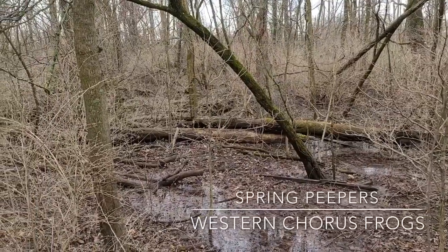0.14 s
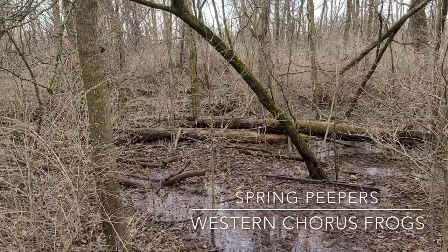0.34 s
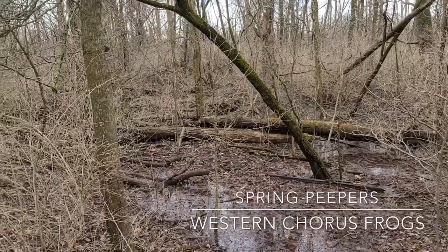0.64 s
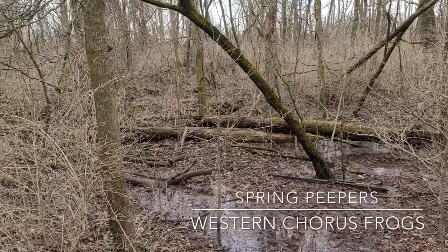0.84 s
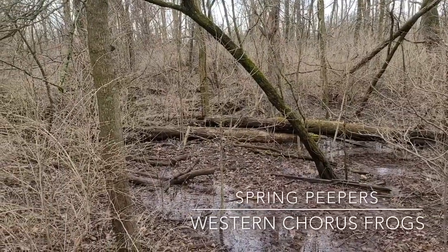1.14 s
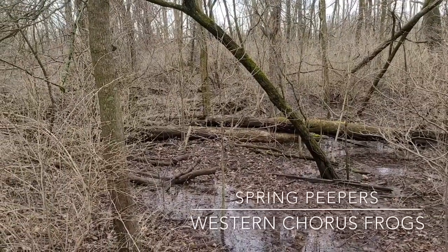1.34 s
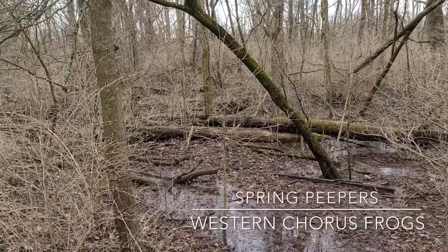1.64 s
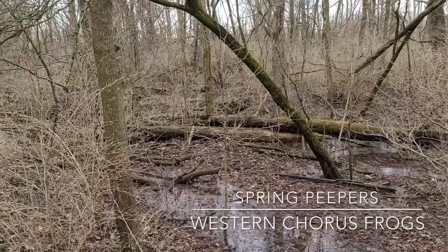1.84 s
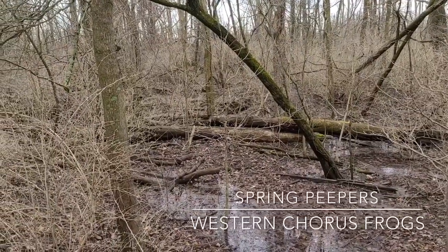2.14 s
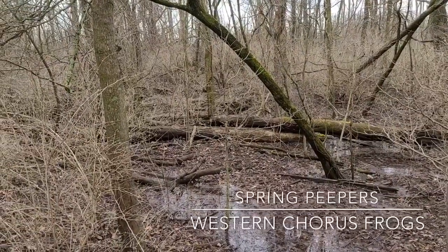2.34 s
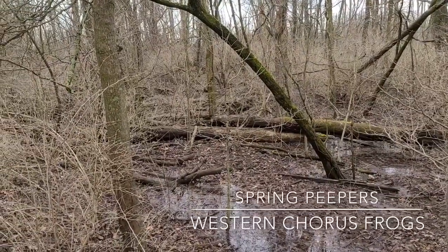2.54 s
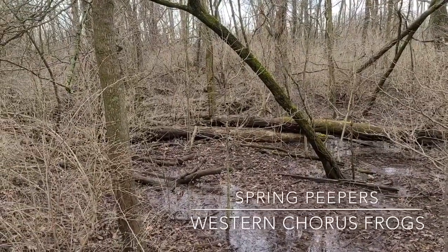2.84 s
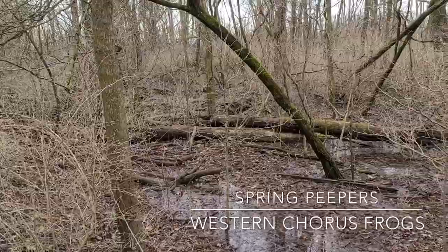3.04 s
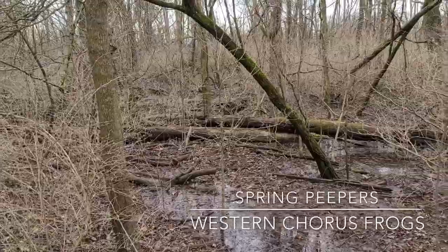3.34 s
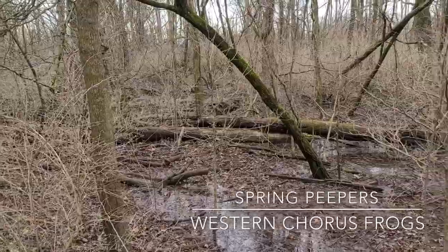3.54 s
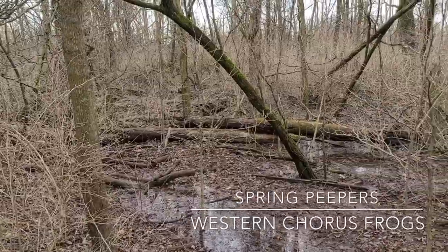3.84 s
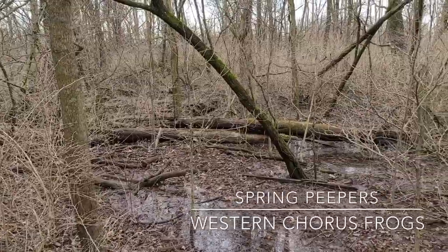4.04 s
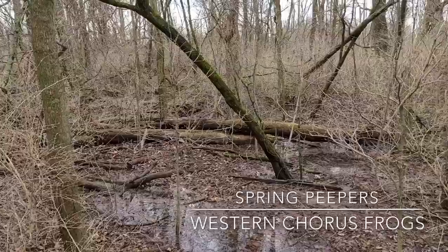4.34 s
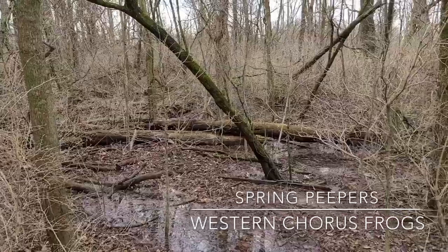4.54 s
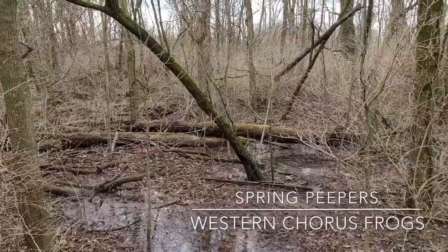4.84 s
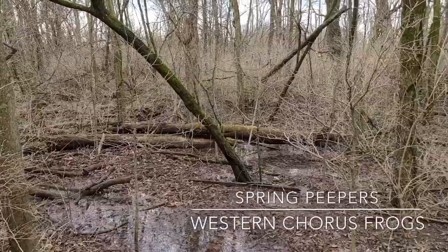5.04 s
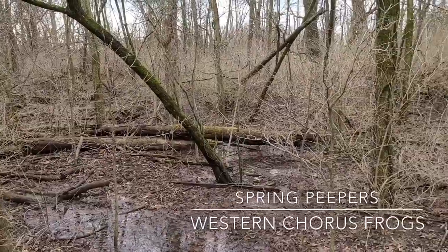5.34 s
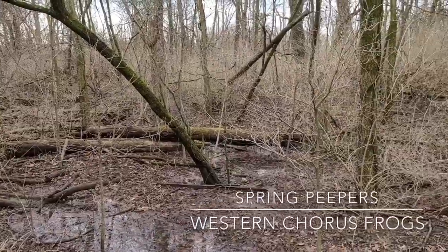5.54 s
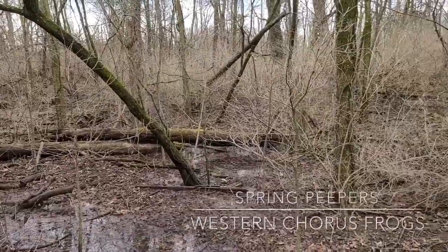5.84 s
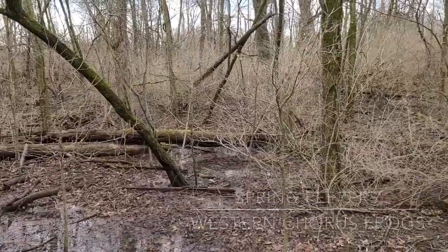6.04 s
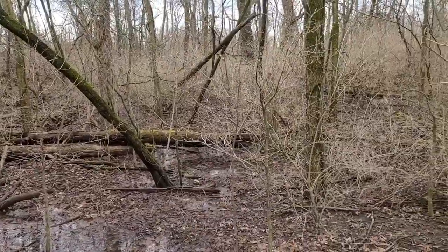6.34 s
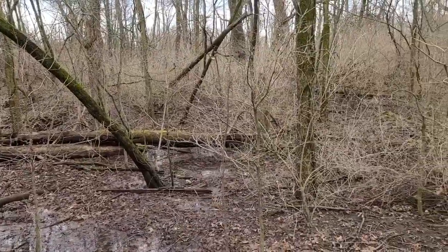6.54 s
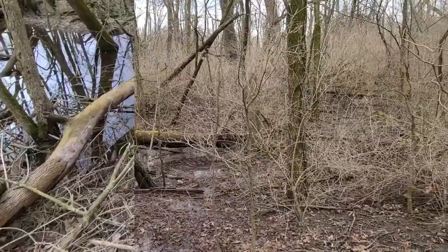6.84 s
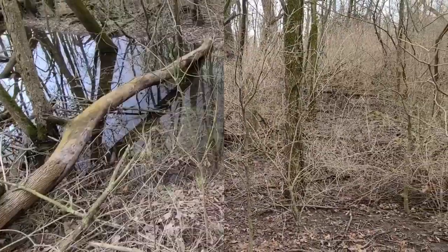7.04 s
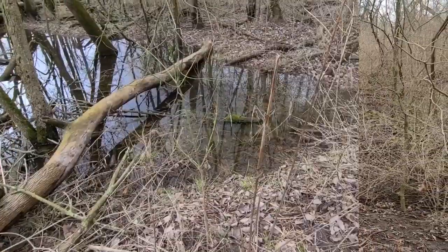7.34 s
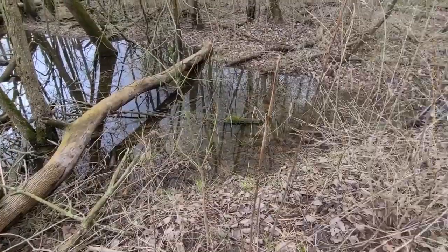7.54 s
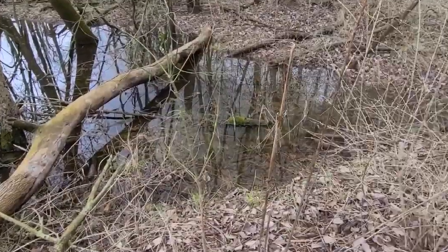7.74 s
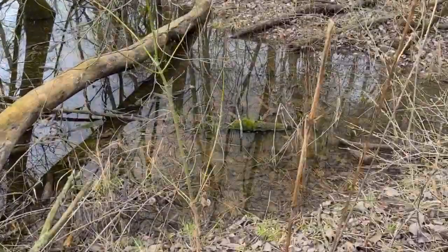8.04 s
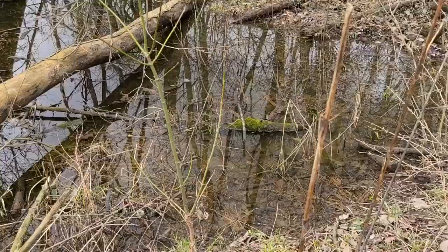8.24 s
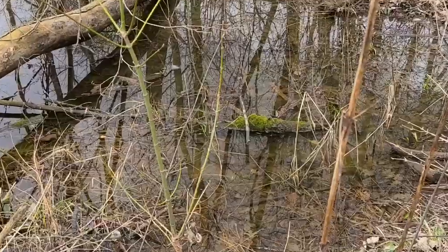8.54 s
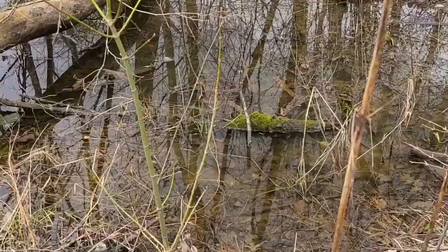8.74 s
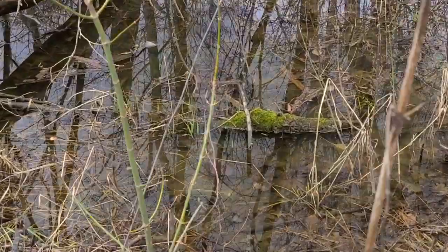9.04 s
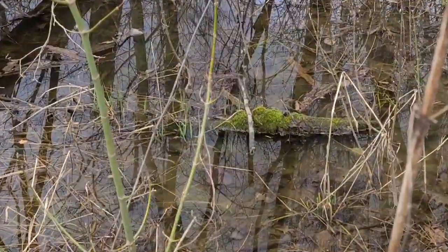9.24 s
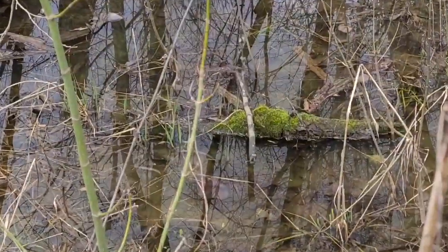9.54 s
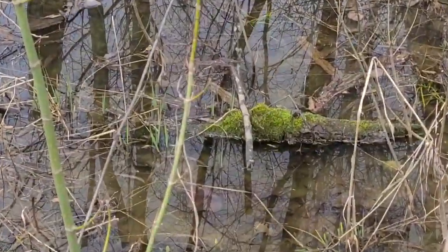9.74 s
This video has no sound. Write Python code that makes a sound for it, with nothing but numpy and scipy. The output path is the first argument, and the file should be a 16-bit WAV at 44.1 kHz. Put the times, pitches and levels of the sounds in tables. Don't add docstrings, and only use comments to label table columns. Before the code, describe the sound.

Outdoors in a wet, leafless wood, overlapping frog trills like a thumbnail along a comb rise in pitch, some nearer, many far and reverberant. Deep road rumble and faint engine drones lie below. Sharp twig cracks and crisp leaf rustles sound close on the left, with tiny bird whistles. After a scene change near seven seconds the frogs drop back, drips click, and close rustling moves right.

```python
import sys
import numpy as np
from scipy import signal
from scipy.io import wavfile
from scipy.ndimage import uniform_filter1d

SR = 44100
rng = np.random.default_rng(int(sys.argv[2]) if len(sys.argv) > 2 else 0)


def field_ratio(decibels):
    return 10 ** (np.asarray(decibels, dtype=float) / 20)


def digitize_waveform(pressure):
    field = np.atleast_2d(pressure).T
    bounded = np.clip(field, -1, 1)
    quanta = np.round(bounded * 32767).astype(np.int16)
    wavfile.write(sys.argv[1], SR, quanta)


N = 436130


def evened(x):
    return x / np.sqrt(np.mean(x ** 2) + 1e-20)


def read(points, hz):
    f, value = np.transpose(points)
    return np.interp(np.log(hz + 1), np.log(f + 1), value)


def sides(pan_db):
    return field_ratio(np.array([pan_db / 2, -pan_db / 2]))


def add(mix, s, sound):
    part = mix[:, round(s * SR):][:, :sound.shape[1]]
    part += sound[:, :part.shape[1]]


def turned(t, pair):
    turn_s, takes_s = 7.0, 0.23
    return np.interp(t, [turn_s - takes_s / 2, turn_s + takes_s / 2], pair)


def spot_level_db(t):
    # t/s, level/dB
    spot = [
        (0, -0.5),
        (6.0, 0.5),
        (6.5, 1.5),
        (7.1, -5),
        (7.45, -8.5),
        (8.1, -7.5),
        (8.5, -5),
        (9.2, -3.5),
        (9.89, -2),
    ]
    s, db = np.transpose(spot)
    return np.interp(t, s, db)


def noise(shape, patchy_db, size=1024):
    # f/Hz, left-right likeness/1
    likeness = [(60, 0.95), (130, 0.97), (290, 0.76), (640, 0.28), (1410, -0.44), (3100, 0.64),
                (6820, -0.13), (15000, 0.0053)]
    frames = 4 * N // size + 5
    hz = np.fft.rfftfreq(size, 1 / SR)
    hz = hz[hz < shape[-1][0]]
    a, b, c, d, patches = rng.standard_normal((frames, len(hz), 5)).T
    patches = uniform_filter1d(patches, size=10, axis=0)
    patches = evened(uniform_filter1d(patches, size=12, axis=1))
    same = np.clip(read(likeness, hz), -1, 1)[:, None]
    left = a + 1j * b
    right = same * left + np.sqrt(1 - same ** 2) * (c + 1j * d)
    z = np.zeros((2, size // 2 + 1, frames), complex)
    z[:, :len(hz)] = [left, right]
    z[:, :len(hz)] *= field_ratio(read(shape, hz)[:, None] + patchy_db * patches)
    return evened(signal.istft(z, nperseg=size, noverlap=3 * size // 4)[1][:, :N])


def trees(x, t60_s, wet_db):
    t = np.arange(SR // 3) / SR
    signs = rng.choice([-1., 1.], (2, len(t)))
    hits = rng.random((2, len(t))) < .05
    taps = signs * hits * field_ratio(-60 * t / t60_s)
    taps *= field_ratio(wet_db) / np.linalg.norm(taps, axis=1, keepdims=True)
    taps[:, 0] = 1
    return signal.fftconvolve(x, taps, axes=1)


def trill(t, hz, count):
    pulses_per_s, ring_s, spread, half_db = 30, .0021, .022, -17
    out = np.zeros((2, len(t)))
    draws = rng.random((count, 4))
    draws[:, 0] -= draws[:, 0].mean() - .5
    for tune, pace, start, lag in draws:
        rate = pulses_per_s * (.7 + .6 * pace)
        pulses = rate * (t - t[0]) + start
        per_pulse = rng.standard_normal((int(pulses[-1]) + 1, 2))
        strength, detune = per_pulse[pulses.astype(int)].T
        beat_s = pulses % 1 / rate
        phase = 2 * np.pi * beat_s * hz * (1 + spread * (2 * tune - 1) + 0.012 * detune)
        burst = field_ratio(2.2 * strength) * beat_s * np.exp(-beat_s / ring_s)
        voice = burst * (np.sin(phase) + field_ratio(half_db) * np.sin(phase / 2))
        out += [voice, np.roll(voice, round(40 * lag - 20))]
    return evened(out)


def near_frogs():
    # t/s, length/s, starting pitch f/Hz, level/dB, left-right/dB
    trills = [(-.06, 0.71, 2670, -50, 3), (.53, 0.67, 2947, -48, 3.5), (1.271, 0.68, 2682, -50, 4),
              (1.919, 0.53, 2910, -52, -1.5), (2.199, 0.56, 2843, -52, 4.5), (2.66, 0.62, 2658, -50, 2),
              (3.349, 0.66, 2952, -52, 2), (3.621, 0.61, 2856, -51.5, 4), (4.132, 0.61, 2625, -49, 3),
              (4.15, 0.41, 2960, -54.5, 2), (4.749, 0.57, 2934, -50.5, 3), (5.179, 0.53, 2880, -53.5, 4.5),
              (5.36, .7, 2645, -54.5, 8), (6.001, 0.31, 2690, -52.5, 4), (6.15, 0.45, 2918, -48.5, 7),
              (6.3, 0.51, 2975, -54.5, 3.5), (6.552, 0.78, 2610, -56.5, 4.5), (6.701, 0.65, 2820, -58, 3.5),
              (7.7, 0.56, 2840, -63.5, 6), (8.1, 0.89, 2873, -58.5, 1.5), (8.881, 0.67, 2900, -59, 3),
              (9.3, 0.59, 2605, -56.5, -3), (9.719, 0.52, 2980, -52.5, -2)]
    climb, climb_bend = .15, .55
    loudest_at, start_db, end_db = .42, -7, -13
    lead_s = 1
    out = np.zeros((2, N + lead_s * SR))
    for s, length, hz, db, pan_db in trills:
        t = np.arange(0, length, 1 / SR)
        u = t / length
        rise_db = start_db * (1 - u / loudest_at) ** 2
        sink_db = end_db * ((u - loudest_at) / (1 - loudest_at)) ** 2
        swell_db = np.where(u < loudest_at, rise_db, sink_db)
        call = trill(t, hz * (1 + climb * u ** climb_bend), count=6)
        call = call * field_ratio(db + swell_db) * signal.windows.tukey(len(t), .12)
        add(out, s + lead_s, trees(call * sides(pan_db)[:, None], t60_s=.24, wet_db=2.2) * field_ratio(-4.3))
    return out[:, lead_s * SR:]


def far_frogs():
    chorus_db, follow = -55.5, 1.23
    lead_s = 1
    out = np.zeros((2, N + lead_s * SR))
    t = np.arange(0, .7, 1 / SR)
    for size, *starts in rng.random((12, 50)):
        hz = (2650 + 380 * size) * (1 + 0.15 * t)
        call = trees(trill(t, hz, count=1) * np.hanning(len(t)), t60_s=0.66, wet_db=21.0)
        for s in starts:
            add(out, s * (N / SR + lead_s), call)
    return evened(out[:, lead_s * SR:]) * field_ratio(chorus_db + follow * spot_level_db(np.arange(N) / SR))


def leaves():
    # t/s, fall/s, level/dB
    stirs = [(1.78, 0.13, -78), (2.3, 0.94, -75), (3.4, .2, -73), (3.66, 0.43, -68.5), (4.13, 0.072, -79),
             (4.7, 1, -75.5), (6.0, 0.34, -74), (6.5, 0.093, -69), (7.3, 0.056, -66), (8.11, 0.09, -66),
             (8.53, 0.15, -67), (9.2, 0.13, -65), (9.56, 0.14, -67), (9.83, 0.11, -66.5)]
    # f/Hz, level/dB per Hz
    hiss = [(1500, -33), (2400, 3), (3700, 0.5), (5000, -4), (6200, -6), (8000, -5.5), (10000, -11.5),
            (12000, -4), (15500, -4.5), (16500, -12)]
    calm_db, dull_db, pan_db = (-74, -75), (-8, -16), (7.5, -11.5)
    rise_share = .4
    t = np.arange(N) / SR
    power = field_ratio(turned(t, calm_db)) ** 2
    for s, fall_s, db in stirs:
        width_s = np.where(t < s, rise_share * fall_s, fall_s)
        power += field_ratio(db) ** 2 * np.exp(-((t - s) / width_s) ** 2)
    strength = field_ratio(2.1 * np.minimum(rng.exponential(1, (2, 1, N)), 4))
    hits = rng.random((2, 1, N)) < .12
    grains = rng.standard_normal((2, 2, N)) * strength * hits
    high = signal.butter(2, 11500, "high", fs=SR, output="sos")
    mid = signal.butter(2, [4200, 8500], "band", fs=SR, output="sos")
    bright = evened(signal.sosfilt(high, grains[0]))
    dull = evened(signal.sosfilt(mid, grains[1]))
    rustle = (bright + dull * field_ratio(turned(t, dull_db))) * np.sqrt(power) * field_ratio(3.5)
    return rustle * sides(turned(t, pan_db)) + noise(hiss, patchy_db=3.0) * field_ratio(-67)


def snaps():
    # t/s, peak level/dB, ring f/Hz, top level/dB
    ticks = [(3.038, -58, 14760, 8), (3.194, -33.5, 10800, -15), (3.3593, -50, 12600, -6),
             (3.5054, -50, 13300, -14), (3.7384, -39, 14900, -14.5), (4.4047, -29.5, 13100, -9),
             (4.4623, -45, 14700, -16), (4.6788, -49, 14540, -13), (4.8908, -53, 14900, -11),
             (6.466, -47, 14700, -11), (6.996, -53, 13600, 0), (7.2952, -39.5, 9140, -8),
             (7.4964, -53, 11700, -10), (7.592, -48, 15400, -9), (8.0486, -49, 15000, -13),
             (8.4043, -32, 8800, -9.5), (8.6757, -53, 13500, -7), (8.7954, -48, 15400, -11),
             (9.257, -47, 15200, -8), (9.6101, -53, 14200, -2)]
    # t/s, peak level/dB, ring f/Hz, top level/dB, low level/dB
    twigs = [
        (3.2894, -42, 4820, -10.5, -13),
        (3.4476, -31.5, 5850, -10, -23),
        (4.0516, -33.5, 5630, -23, -17.5),
        (7.2794, -49, 4900, -14, -11),
        (8.4041, -37.5, 5110, -14, -11.5),
        (9.5143, -35.5, 4860, -12, -13),
        (9.6485, -30.5, 5170, -29, -25.5),
        (9.7635, -50, 5680, -17, -9),
        (9.8016, -50, 5800, -6, -20),
    ]
    tick_body_db = -12
    pan_db = (6, -7.5)
    out = np.zeros((2, N))
    t = np.arange(1500) / SR
    low = signal.butter(2, [2200, 9000], "band", fs=SR, output="sos")
    top = signal.butter(2, 9000, "high", fs=SR, output="sos")
    rows = list(twigs) + [(*tick, tick[3] + tick_body_db) for tick in ticks]
    swell = t / 0.00046 * np.exp(-t / 0.00055)
    for s, db, hz, top_db, low_db in rows:
        crack = rng.standard_normal(len(t)) * (swell + .08 * np.exp(-t / .005))
        crack[12] += .9
        snap = 0.7 * np.sin(2 * np.pi * hz * t) * swell
        snap += field_ratio(low_db + 18.0) * signal.sosfilt(low, crack)
        snap += field_ratio(top_db + 13.5) * signal.sosfilt(top, crack)
        for side, gain in enumerate(sides(turned(s, pan_db))):
            late_s = .0004 * (gain < 1)
            add(out[side:side + 1], s + late_s, field_ratio(db + 3.0) * gain * snap[None])
    return out


def scuffs():
    # t/s, length/s, centre f/Hz, width/Hz, level/dB
    scrapes = [(3.348, 0.044, 13000, 5000, -63), (3.586, 0.062, 5470, 2500, -68),
               (4.034, 0.05, 4930, 3000, -56.5), (4.392, 0.054, 12900, 6060, -57.5),
               (5.771, 0.19, 4050, 500, -65), (7.116, 0.037, 5270, 1200, -65),
               (7.126, .03, 10000, 8000, -63), (7.299, 0.091, 7200, 500, -67),
               (9.487, 0.1, 5230, 3000, -58), (9.465, 0.13, 12100, 7000, -54.5),
               (9.807, 0.065, 5500, 2500, -60.5)]
    pan_db = (6, -3)
    out = np.zeros((2, N))
    for s, length, hz, width, db in scrapes:
        edges_hz = [hz - width / 2, min(hz + width / 2, 15800)]
        band = signal.butter(2, edges_hz, "band", fs=SR, output="sos")
        z = evened(signal.sosfilt(band, rng.standard_normal((2, SR // 4))))[:, :round(length * SR)]
        z = z * signal.windows.tukey(z.shape[1], .7)
        add(out, s, field_ratio(db) * z * sides(turned(s, pan_db))[:, None])
    return out


def birds_and_drips():
    # t/s, length/s, from f/Hz, to f/Hz, level/dB
    whistles = [(1.363, .1, 8800, 8870, -75), (1.494, 0.059, 5900, 8160, -66), (2.698, .1, 2450, 2270, -67),
                (3.355, 0.024, 2080, 2350, -51.5), (5.293, 0.038, 5960, 7900, -63),
                (5.418, 0.14, 8800, 8900, -74), (5.77, .07, 1720, 1790, -56), (5.81, .12, 2010, 2050, -59),
                (5.86, .08, 1790, 1830, -61), (6.21, .1, 1640, 1590, -56), (7.12, .07, 2150, 2100, -61),
                (7.18, .03, 2000, 1880, -59), (7.2, .04, 1700, 1450, -58), (7.593, 0.0035, 2320, 1700, -48),
                (8.646, .009, 2170, 2100, -44)]
    pan_db = 4
    out = np.zeros((2, N))
    for s, length, from_hz, to_hz, db in whistles:
        hz = np.linspace(from_hz, to_hz, round(length * SR))
        note = np.sin(2 * np.pi * np.cumsum(hz) / SR) * signal.windows.tukey(len(hz), .6)
        note *= 1 + .25 * evened(uniform_filter1d(rng.standard_normal(len(hz)), size=150))
        wet_db = min(-14 + 200 * length, -3)
        add(out, s, trees(field_ratio(db) * note * sides(pan_db)[:, None], t60_s=0.55, wet_db=wet_db))
    return out


def road():
    # f/Hz, level/dB per Hz
    rumble = [(12, -30), (20, -30), (38, 0.5), (76, 1.5), (89, 1.5), (200, -18.5), (260, -53), (440, -120)]
    wash = [(71, -22), (120, -7.5), (193, -9.5), (561, -17), (864, -23), (1400, -27.5), (1820, -63),
            (3080, -120)]
    murmur = [(710, -41), (1200, -14), (1650, -0.5), (2370, -12), (2500, -13), (3250, -7), (5500, -120)]
    t = np.arange(N) / SR
    spot_db = spot_level_db(t)
    out = noise(rumble, patchy_db=1.0, size=4096) * field_ratio(-36.5 - 0.39 * t + 0.63 * spot_db)
    out += noise(wash, patchy_db=0.77) * field_ratio(-46 + .99 * spot_db)
    out += noise(murmur, patchy_db=1.5) * field_ratio(-60.5 + 0.35 * t + 0.47 * spot_db)
    return out


def engines():
    # t/s, length/s, from f/Hz, to f/Hz, level/dB
    drones = [
        (-.4, 2.55, 80.1, 80.1, -36),
        (-.4, 2.5, 46.3, 47.5, -43.5),
        (3.0, 1.6, 47, 46, -39),
        (5.7, 1.1, 70.4, 79, -41),
        (8.6, 1.1, 127, 129, -52),
    ]
    t = np.arange(N) / SR
    out = np.zeros(N)
    for s, length, from_hz, to_hz, db in drones:
        u = np.clip((t - s) / length, 0, 1)
        hz = from_hz + (to_hz - from_hz) * u
        tone = np.sin(2 * np.pi * np.cumsum(hz) / SR)
        out += np.sqrt(2) * field_ratio(db) * np.sin(np.pi * u) ** 0.8 * tone
    return out


def scene():
    frogs = near_frogs() + far_frogs()
    near = leaves() + snaps() + scuffs()
    return frogs + near + birds_and_drips() + road() + engines()


def masked(x):
    below_db, slope_db_per_band, dip_db = 10, 3.4, 2.3
    z = signal.stft(x, nperseg=2048, noverlap=1024)[2]
    power = abs(z[:, :1024].reshape(2, 128, 8, -1)) ** 2
    level_db = 10 * np.log10(power.mean((0, 2)) + 1e-20)
    band = np.arange(128)[:, None]
    spread_db = [level_db[k] - slope_db_per_band * (band - k) for k in range(18, 21)]
    under_mask = level_db < np.max(spread_db, 0) - below_db
    in_dip = level_db < uniform_filter1d(level_db, size=7, axis=0) - dip_db
    lost = (under_mask | in_dip) & (band > 20) & (band < 66)
    lost = lost | (band > 91)
    z[:, :1024] *= np.repeat(~lost, 8, axis=0)
    return signal.istft(z, nperseg=2048, noverlap=1024)[1][:, :N]


def roll_off(x):
    return signal.sosfilt(signal.butter(12, 16780, fs=SR, output="sos"), x)


def record(dry):
    mix = masked(dry)
    return roll_off(mix)


dry = scene()
out = record(dry)
digitize_waveform(out)
```